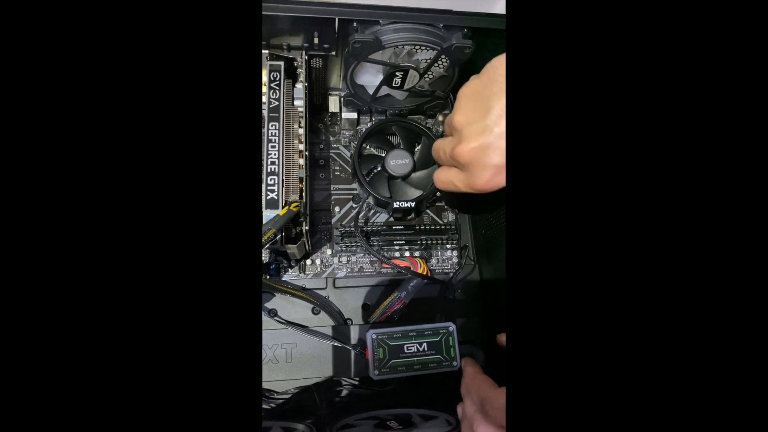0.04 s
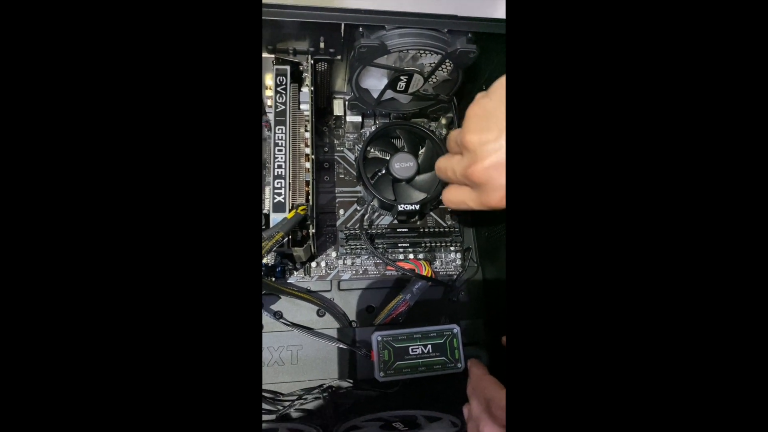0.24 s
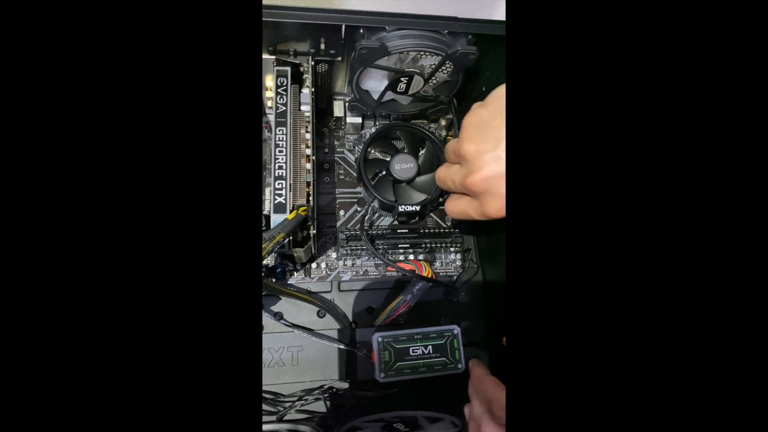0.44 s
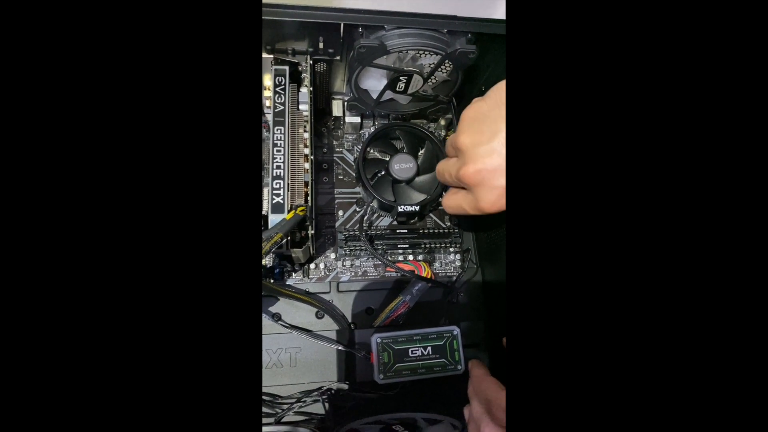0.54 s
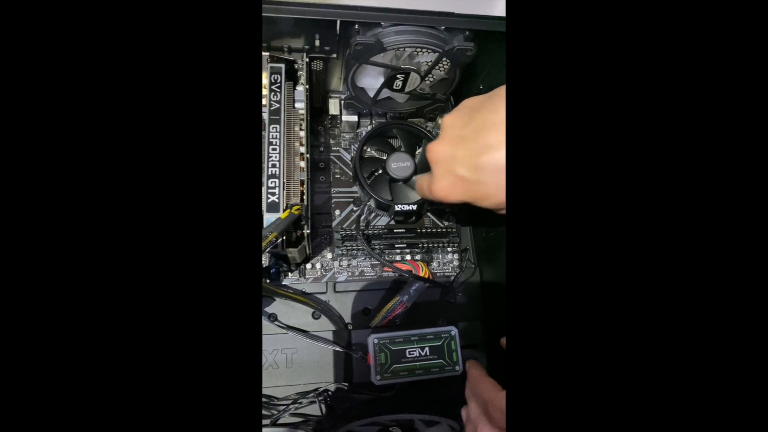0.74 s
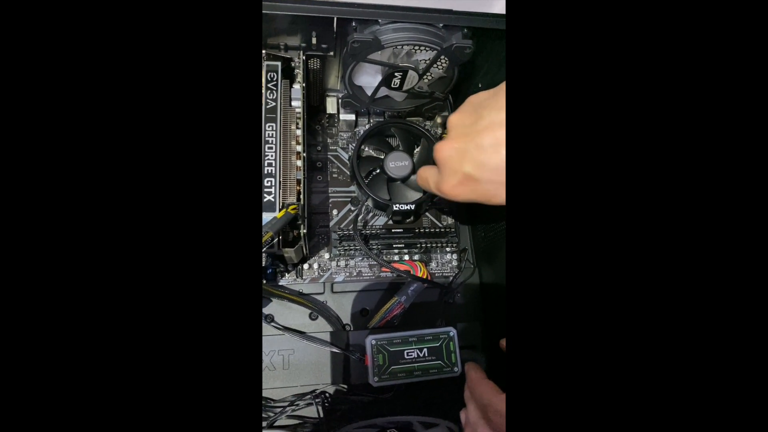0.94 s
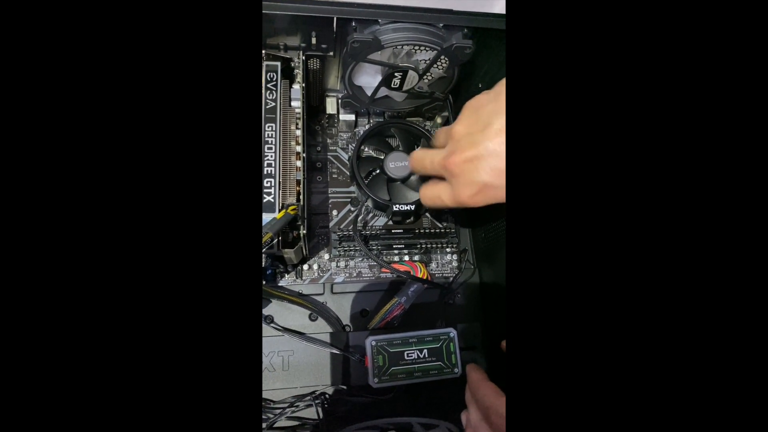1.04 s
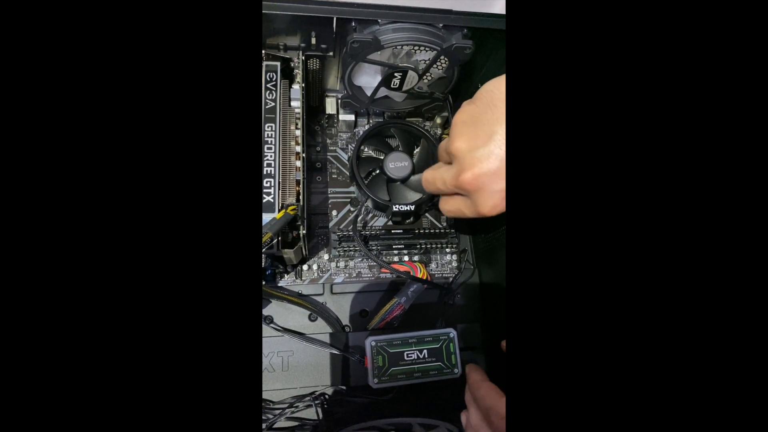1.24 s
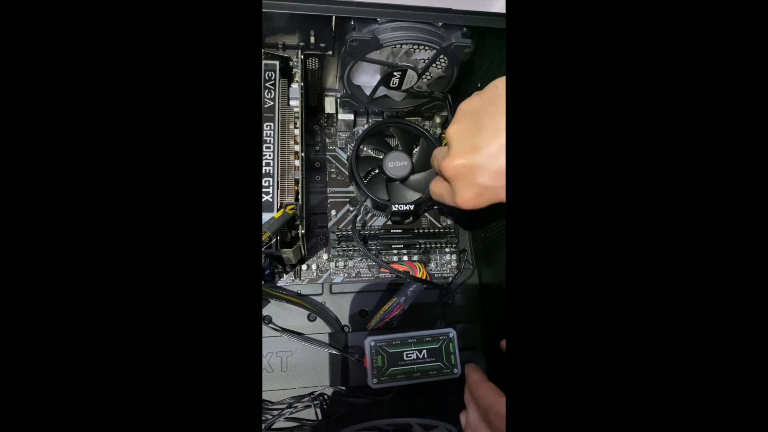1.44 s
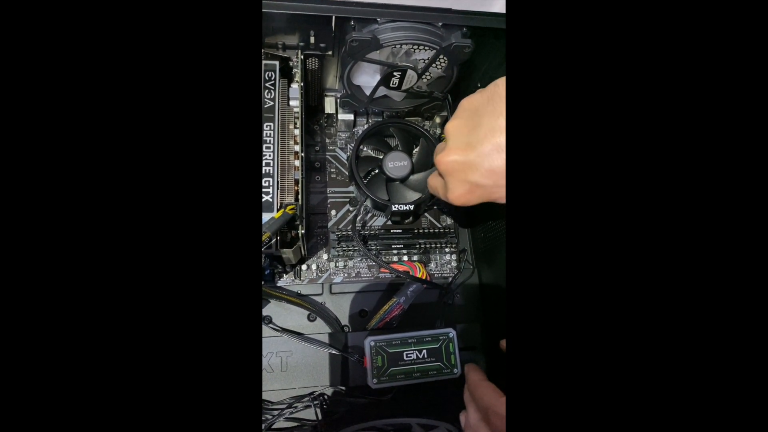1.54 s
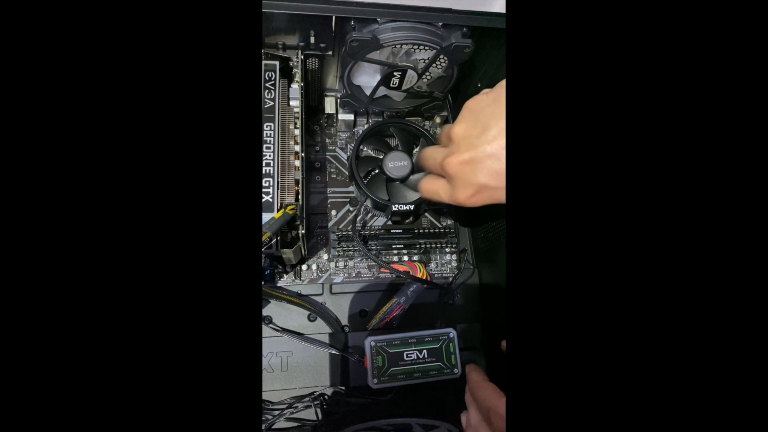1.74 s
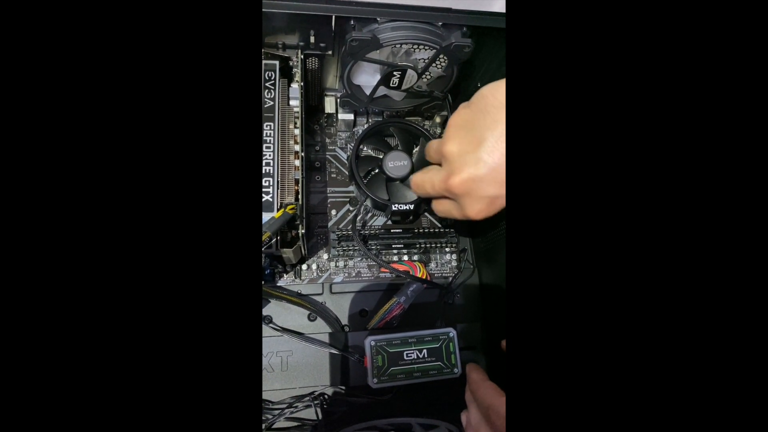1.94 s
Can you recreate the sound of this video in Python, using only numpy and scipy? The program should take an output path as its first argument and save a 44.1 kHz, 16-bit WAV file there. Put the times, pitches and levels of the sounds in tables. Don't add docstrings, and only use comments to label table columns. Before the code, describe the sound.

A screwdriver turns a screw inside an open computer case: faint rubbing, a hard clacking snap almost at once with a brief metallic ring, then small uneven clicks to the end; close phone microphone, quiet room.

```python
import sys
import numpy as np
from scipy import signal
from scipy.fft import rfft, irfft, next_fast_len
from scipy.io import wavfile
from scipy.ndimage import uniform_filter1d

SR = 44100
rng = np.random.default_rng(int(sys.argv[2]) if len(sys.argv) > 2 else 0)


def generate_wav(signal):
    frames = np.transpose(np.atleast_2d(signal))
    scaled = np.clip(frames, -1, 1) * 32767
    pcm = np.round(scaled).astype(np.int16)
    wavfile.write(sys.argv[1], SR, pcm)


def gain_from_db(level_db):
    decades = np.asarray(level_db, float) / 20
    return 10 ** decades


N = 88200
RISE_S = 0.00062
TAP_T60 = 0.0016

# time in seconds, level in dB.
RUMBLE_DB = [(0.0, -57.5), (0.23, -69), (0.36, -57.5), (0.52, -59), (0.73, -65), (1.0, -61), (1.11, -62),
             (1.42, -59.5), (1.54, -66), (1.75, -61), (2.0, -57)]
# pitch in Hz, level in dB, time to fall 60 dB in seconds.
COOLER = [(1094, 12.5, 0.017), (1373, -1, .03), (1576, -7, 0.02), (1860, -2, 0.027), (2000, 0, 0.026),
          (2209, -3.5, .02), (2610, -8.5, 0.0078)]
# start in seconds, then the levels in dB of the
TICKS = [(0.1377, -63.5, -68, -71, -62), (0.1487, -88, -62, -50, -77), (0.1708, -79, -49.5, -65, -55.5),
         (0.4431, -62, -44.5, -97, -89), (0.6273, -28, -42, -45.5, -57), (0.9692, -50, -47.5, -87, -57.5),
         (0.9823, -42.5, -44, -46.5, -80), (0.9956, -43, -34.5, -48.5, -49.5),
         (1.0044, -70, -75, -35.5, -82.5), (1.0876, -39.5, -39.5, -57, -57), (1.1814, -68, -76, -49.5, -71),
         (1.2351, -77.5, -48, -59.5, -103), (1.2695, -50.5, -46, -57, -72),
         (1.2979, -50.5, -48.5, -50, -69), (1.6429, -54.5, -42.5, -45.5, -76),
         (1.682, -75, -57.5, -80, -78), (1.7195, -46.5, -44.5, -56, -89), (1.7569, -45.5, -45, -62, -60),
         (1.7616, -56, -62, -49, -54), (1.8563, -44, -50, -54, -66), (1.8658, -73, -123, -60, -75),
         (1.9092, -29, -36, -37.5, -65.5), (1.9944, -40.5, -38.5, -52, -62)]
# start in seconds, then the levels in dB of the
SNAP = [
    (0.209, -53.5, -19, -57, -63.5),
    (0.211, -24, -30.5, -58.5, -47),
    (0.214, -9, -18, -38, -44),
    (0.2178, -22.5, -45.5, -32.5, -48.5),
    (0.2215, -42, -36.5, -45, -35),
]
TOUCHES = list(TICKS) + list(SNAP)


def evened(x):
    return x / np.sqrt(np.mean(x ** 2) + 1e-20)


def noise():
    return rng.standard_normal(N)


def read(points, hz):
    f, value = np.transpose(points)
    return np.interp(np.log(hz + 1), np.log(f + 1), value)


def coloured(x, points):
    gain = gain_from_db(read(points, np.fft.rfftfreq(N, 1 / SR)))
    return irfft(rfft(x) * gain, N)


def curve(rows, *columns):
    rows = np.array(rows, float)
    db = rows[:, list(columns)].sum(axis=1)
    return gain_from_db(np.interp(np.arange(N) / SR, rows[:, 0], db))


def ringing(x, modes):
    t = np.arange(SR // 2) / SR
    body = sum(gain_from_db(db - 60 * t / t60) * np.sin(2 * np.pi * hz * t) for hz, db, t60 in modes)
    return signal.fftconvolve(x, body / np.linalg.norm(body))[:N]


def bursts(rows, column, t60):
    rows = np.array(rows)
    t = np.arange(SR // 10) / SR
    train = np.zeros(N)
    at = np.minimum((rows[:, 0] * SR).astype(int), N - 1)
    np.add.at(train, at, gain_from_db(rows[:, column]))
    shape = np.minimum(t / RISE_S, 1) * gain_from_db(-60 * t / t60)
    return signal.fftconvolve(train, shape)[:N]


def push(rows, column, t60):
    return np.gradient(bursts(rows, column, t60))


def thinned(x, hz=696):
    return signal.sosfilt(signal.butter(4, hz, "high", fs=SR, output="sos"), x)


def rumble():
    # pitch in Hz, level in dB.
    colour = [(20, -24), (45, 2), (65, 5), (130, 2), (200, -0.5), (400, -11.5), (520, -15.5), (900, -40)]
    return evened(coloured(noise(), colour)) * curve(RUMBLE_DB, 1)


def mains_hum():
    # pitch in Hz, rms level in dB.
    tones = [(60, -64), (120, -68), (180, -75), (239, -73), (299, -78), (359.5, -67.5)]
    width_hz = 8
    t = np.arange(N) / SR
    swell = np.sqrt(evened(curve(RUMBLE_DB, 1)))
    r = np.exp(-np.pi * width_hz / SR)
    out = np.zeros(N)
    for hz, db in tones:
        sway = signal.lfilter([1], [1, -r], noise() + 1j * noise())
        waver = 0.9 + sway / np.std(sway)
        tone = (waver * np.exp(2j * np.pi * hz * t)).real
        out += gain_from_db(db) * swell * evened(tone)
    return out


def hiss():
    # pitch in Hz, level in dB.
    colour = [(400, 8), (1000, -16), (2800, -0.5), (4500, -10.5), (7200, -5.5), (10000, -28), (16000, -11)]
    return gain_from_db(-76) * evened(coloured(noise(), colour))


def rubbing():
    # time in seconds, rubbing level in dB, brightness in dB, pressure on the case in dB.
    strokes = [(0, -66.5, 0.5, 3), (.12, -74, -15, -7), (.19, -61, -5.5, -5), (.32, -63.5, 1, -0.5),
               (.48, -68, -20.5, -11.5), (.56, -62, 1.5, -1), (.66, -71, 4.5, 5.5), (.78, -87.5, 10.5, 2),
               (.96, -94.5, -7.5, -9), (1.05, -66.5, 7, 0), (1.15, -86.5, -15, -4),
               (1.33, -74.5, 7.5, -4.5), (1.35, -65, 4, 9), (1.49, -66, 7, 7.5), (1.58, -91.5, 10, -16.5),
               (1.67, -75, -1.5, -1.5), (1.8, -73.5, 7, 1.5), (2, -88, 1, 19)]
    # pitch in Hz, level in dB.
    dull_colour = [(300, -30), (700, -7), (1200, 5), (1600, -1), (2300, 0), (3300, -5), (5000, -26.5)]
    # pitch in Hz, level in dB.
    fizz_colour = [(2000, -36), (3500, -17), (5500, -10), (7200, -17), (10000, -12), (13500, -19),
                   (16000, -25)]
    # pitch in Hz, level in dB, time to fall 60 dB in seconds.
    thread = [(640, -11, .1), (848, 0, .1), (912, -6, .08), (1048, -4, .08), (2015, -7, .06),
              (2340, -5, .05), (2810, -9, .04), (3850, -13, .04), (4160, -15, .04), (5000, -12, .02),
              (5570, -11, .04), (8390, -14, .02), (9680, -13, .03), (10500, -14, .03)]
    grit_per_s, grit_db, stick_db = 480, 12.5, 2

    hits = rng.random(N) < grit_per_s / SR
    grains = gain_from_db(grit_db * np.minimum(rng.exponential(1, N), 2)) * hits
    grit = evened(noise() * (1.8 + uniform_filter1d(grains, size=40) * 4))
    slow = uniform_filter1d(uniform_filter1d(noise(), size=300), size=300)
    stick = gain_from_db(stick_db * evened(slow))

    dull = coloured(grit, dull_colour)
    rub = dull * curve(strokes, 1) + coloured(grit, fizz_colour) * curve(strokes, 1, 2)
    pressed = grit * stick * curve(strokes, 1, 3)
    thread_ring = gain_from_db(-4) * thinned(ringing(pressed, thread), hz=507)
    cooler_ring = gain_from_db(-13.5) * ringing(pressed, COOLER)
    return rub / np.std(dull) + thread_ring + cooler_ring


def bright_ticks():
    # pitch in Hz, level in dB.
    crack = [(1000, 4), (2500, 0), (4000, 6), (6000, 5), (8000, 8), (10500, 5), (13000, 8), (16000, -19.5)]
    # pitch in Hz, level in dB, time to fall 60 dB in seconds.
    steel = [(3288, -3, .018), (3650, -6, .02), (4260, -4.5, .02), (5065, -3, .03), (5880, 5, .025),
             (8390, -0.5, .03), (9100, -12, .03), (10450, -5, .04), (11200, -10, .027)]
    tick = bursts(TOUCHES, column=1, t60=0.018)
    return tick * evened(coloured(noise(), crack)) * 0.33 + gain_from_db(-11.5) * ringing(tick * noise(), steel)


def cooler_knocks():
    rattle = bursts(TOUCHES, column=2, t60=0.029) * noise() * gain_from_db(-9.0)
    tap = push(TOUCHES, column=2, t60=TAP_T60) * gain_from_db(15.0)
    return ringing(rattle + tap, COOLER)


def case_rattle():
    # pitch in Hz, level in dB, time to fall 60 dB in seconds.
    case = [(770, -15, .04), (846, 0, .1), (915, -17, .05), (1050, -14, .05), (1300, -17, .05)]
    tap = push(TOUCHES, column=3, t60=TAP_T60) * gain_from_db(29.5)
    rattle = bursts(TOUCHES, column=3, t60=0.11) * noise() * gain_from_db(-14)
    return ringing(tap + rattle, case)


def panel_thumps():
    # pitch in Hz, level in dB, time to fall 60 dB in seconds.
    panel = [(64, -8, .4), (143, 9, .22), (240, -6, .15), (308, -8, .07), (360, -8, .2)]
    return ringing(push(TOUCHES, column=4, t60=0.0075), panel) * gain_from_db(35.0)


def snap_crash():
    # pitch in Hz, level in dB.
    colour = [(300, -12), (800, 2.5), (1300, 4.5), (2000, 2.5), (2800, -10), (5000, -25)]
    return gain_from_db(-21.5) * bursts(SNAP, column=2, t60=0.057) * evened(coloured(noise(), colour))


def loose_jangle():
    # pitch in Hz, level in dB.
    colour = [(150, -16), (700, 3.5), (1500, 8), (2500, -29.5), (3500, -6), (5500, -4), (10000, -0.5),
              (16000, -4)]
    grains = noise() * rng.exponential(1, N)
    return gain_from_db(-27) * bursts(SNAP, column=1, t60=0.13) * evened(coloured(grains, colour))


def fin_ring():
    # pitch in Hz, level in dB, time to fall 60 dB in seconds.
    fins = [(641, -10, .18), (856, -3, .22), (953, -10, .25), (1135, -4, .08), (1227, -4, .16),
            (1335, -6, .1), (1560, -3, .14), (1720, -13, .25), (2141, -8, .5), (2161, -4, .65),
            (3424, -13, .3), (4646, -5, .1), (5669, -10, .1)]
    return gain_from_db(10) * ringing(push(SNAP[2:3], column=1, t60=TAP_T60), fins)


def pings():
    # start in seconds, pitch in Hz, level in dB, time to fall 60 dB in seconds.
    touched = [(0.211, 2000, -24.5, 0.034), (0.29, 850, -54, 0.099), (0.628, 3340, -53, .03),
               (0.969, 1990, -62, 0.029), (0.983, 2034, -48.5, 0.039), (0.994, 2750, -52.5, 0.031),
               (1.045, 353, -52, 0.15), (1.089, 1760, -49.5, 0.019), (1.1, 1210, -60.5, 0.079),
               (1.237, 1604, -57.5, 0.026), (1.24, 1107, -55, 0.027), (1.285, 2360, -61, 0.069),
               (1.683, 3320, -65, 0.048), (1.7195, 2030, -48, 0.017), (1.735, 860, -60, .1),
               (1.757, 2000, -59, 0.033), (1.759, 710, -48.5, .04), (1.856, 2160, -61, .02),
               (1.911, 3200, -50, 0.036), (1.994, 2820, -51, 0.021)]
    out = np.zeros(N + SR)
    t = np.arange(SR // 4) / SR
    for s, hz, db, t60 in touched:
        strength = gain_from_db(db - 60 * t / t60) * np.minimum(t / RISE_S, 1)
        out[round(s * SR):][:len(t)] += strength * np.sin(2 * np.pi * hz * t)
    return out[:N]


def room(x):
    # pitch in Hz, time to fall 60 dB in seconds.
    decay = [(300, 0.46), (1000, 0.14), (3000, 0.12), (6000, 0.096), (12000, 0.029)]
    taps = np.zeros(SR // 2)
    at = np.arange(120, SR // 2 - 20, 20)
    taps[at + rng.integers(0, 20, len(at))] = rng.choice([-1., 1.], len(at))
    hz, t, z = signal.stft(taps, SR, nperseg=256)
    fall = gain_from_db(-60 * t / read(decay, hz)[:, None])
    tail = signal.istft(z * fall, SR, nperseg=256)[1]
    return signal.fftconvolve(x, tail / np.linalg.norm(tail))[:N]


def ports(x):
    # pitch in Hz, how far the left leads in radians.
    lead = [(1500, 0), (5200, .7), (6700, 2.75), (7900, 3.5), (10500, 6.28), (13000, 9.0), (14300, 9.8),
            (16200, 13)]
    # pitch in Hz, likeness of left and right from 0 to 1.
    same = [(150, .985), (300, .8), (700, .85), (1200, .75), (2200, .65), (4000, .8), (6000, .99),
            (16000, .995)]
    # pitch in Hz, left level above right in dB.
    left_db = [(200, 0), (600, 2.3), (1200, 2.7), (2500, -1.2), (5000, .3), (9000, -.5)]
    size = next_fast_len(N + 4096)
    hz = np.fft.rfftfreq(size, 1 / SR)
    z = rfft(x, size)
    smear = rfft(rng.standard_normal(2000) * np.exp(-np.arange(2000) / 400.), size)
    power = abs(smear) ** 2
    other = z * smear / np.sqrt(power + np.mean(power)) * 1.5
    angle = np.arccos(np.clip(read(same, hz), 0, 1)) / 2
    shared, unlike = np.cos(angle) * z, np.sin(angle) * other
    turn = np.exp(.5j * np.interp(hz, *np.transpose(lead))) * gain_from_db(read(left_db, hz) / 2)
    pair = [(shared + unlike) * turn, (shared - unlike) / turn]
    return irfft(np.array(pair), size)[:, :N]


def port_rumble():
    # pitch in Hz, level in dB.
    colour = [(20, 0), (60, 2.5), (130, -5), (250, -6), (450, -6.5), (800, -27)]
    return gain_from_db(-75) * np.outer([1, -1], evened(coloured(noise(), colour)))


def scene():
    background = rumble() + mains_hum() + hiss()
    work = rubbing() + bright_ticks() + thinned(cooler_knocks() + snap_crash()) + loose_jangle()
    rings = case_rattle() + panel_thumps() + fin_ring() + pings()
    heard = ports(work + rings + gain_from_db(-8.5) * room(work) + background)
    return heard + port_rumble()


def low_pass(x):
    return signal.sosfilt(signal.butter(12, 16630, fs=SR, output="sos"), x)


def record(dry):
    low = signal.butter(2, 54.8, "high", fs=SR, output="sos")
    top = signal.butter(20, 15500, fs=SR, output="sos")
    mix = signal.sosfilt(np.vstack([low, top]), dry)
    return low_pass(mix)


dry = scene()
out = record(dry)
generate_wav(out)
```